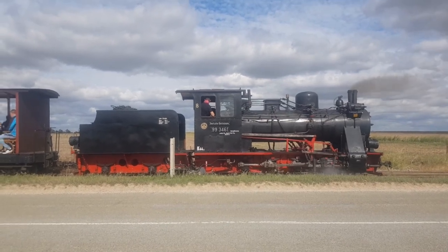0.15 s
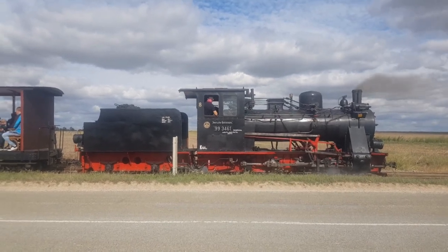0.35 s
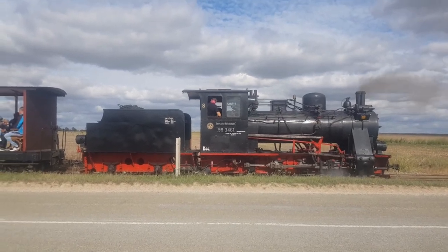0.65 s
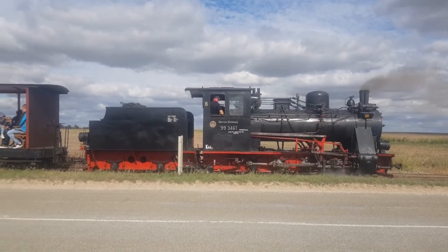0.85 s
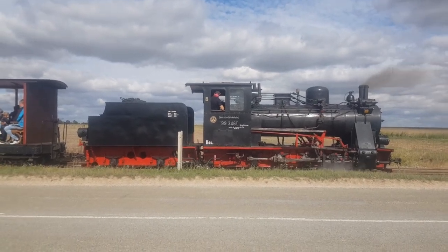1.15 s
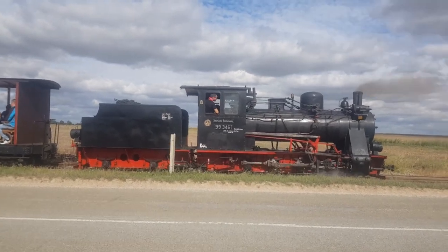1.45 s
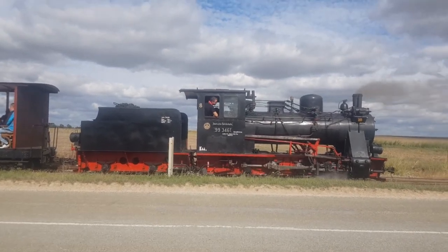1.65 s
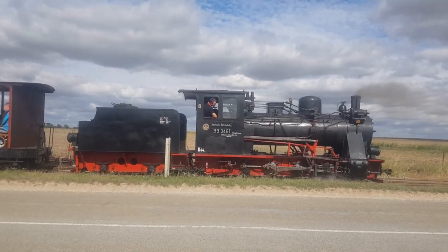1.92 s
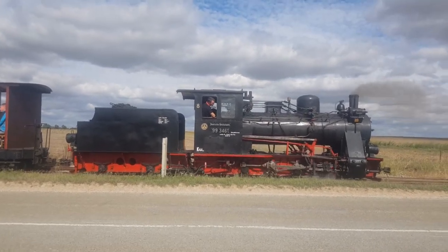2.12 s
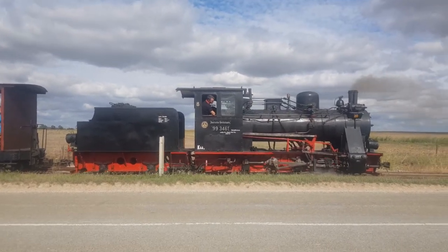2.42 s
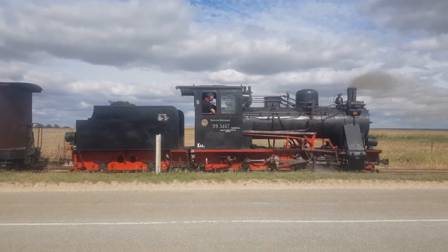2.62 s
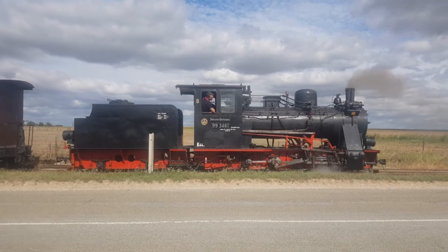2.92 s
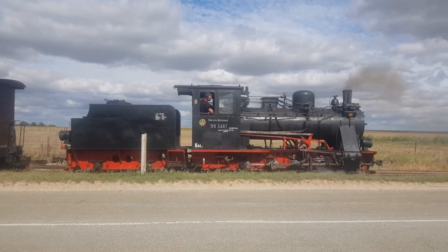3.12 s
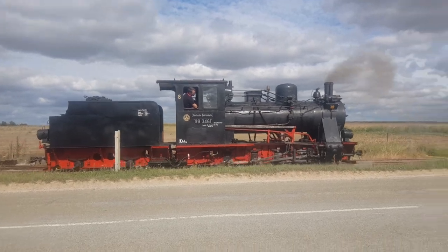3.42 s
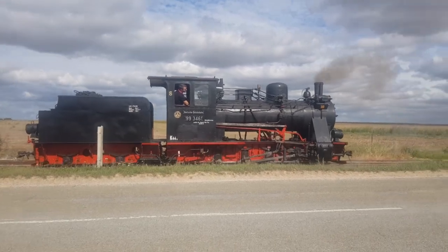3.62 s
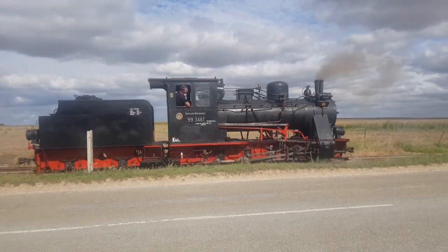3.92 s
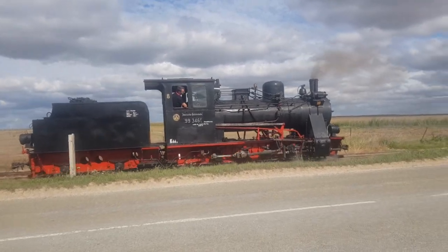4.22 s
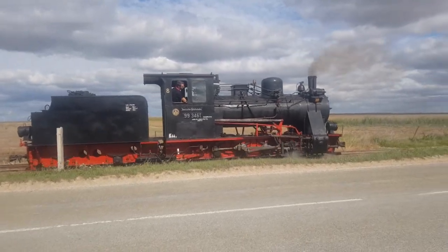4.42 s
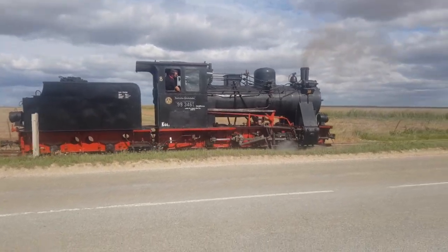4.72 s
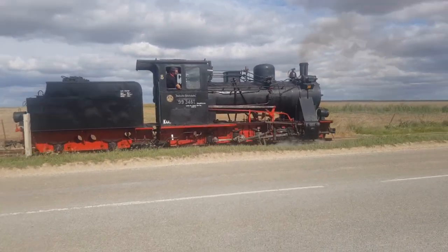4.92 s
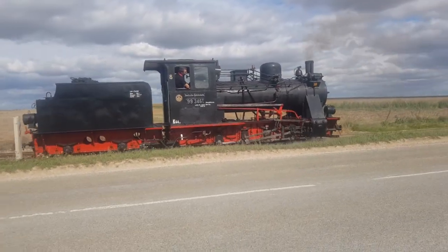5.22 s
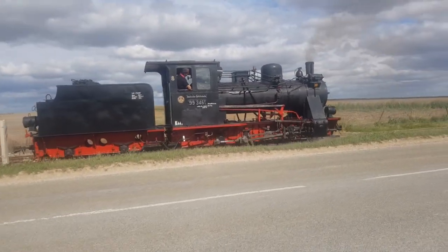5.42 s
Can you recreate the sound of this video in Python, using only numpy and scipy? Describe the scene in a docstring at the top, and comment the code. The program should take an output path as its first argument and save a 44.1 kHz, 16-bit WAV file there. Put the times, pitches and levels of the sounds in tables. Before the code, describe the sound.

A steam jet hisses, surges and fades on the left while low gusts slap a muffled right channel and wind bursts break up the ending.

```python
"""Steam engine passing in the wind

A small steam locomotive rolls slowly past in open, windy country, steam hissing from its cylinder drains.
The jet is shaped noise that surges, dips, briefly whistles and fades as the engine pulls ahead.
It reaches the open left microphone port, where gusts rumble and runs of pressure kicks flutter and splutter.
The right port is muffled: mostly low wind noise and slow slaps on the membrane, with a faint leak of steam.
"""
import sys
import numpy as np
from scipy import signal
from scipy.fft import rfft, irfft, next_fast_len
from scipy.io import wavfile
from scipy.ndimage import uniform_filter1d, map_coordinates

SR = 44100
rng = np.random.default_rng(int(sys.argv[2]) if len(sys.argv) > 2 else 0)


def inscribe(sig):
    """Save sig as 16-bit PCM at rate SR to the path in sys.argv[1].

    A 1-D sig is mono; a 2-D sig holds one channel per row.
    Samples are clipped to [-1, 1] before scaling.
    """
    pcm = np.round(np.clip(np.atleast_2d(sig).T, -1, 1) * 32767)
    wavfile.write(sys.argv[1], SR, pcm.astype(np.int16))


N = 244755


def amp(db):
    """Decibels to gain."""
    return 10 ** (np.asarray(db) / 20)


def unit(x):
    """x scaled to rms 1."""
    return x / np.sqrt(np.mean(x ** 2) + 1e-20)


def curves(rows):
    """One value per sample for each column after the time."""
    s, *columns = np.transpose(rows)
    return [np.interp(np.arange(N) / SR, s, column) for column in columns]


def wobble(rate):
    """A smooth random curve through normal-distributed knots, rate knots a second."""
    knots = rng.standard_normal(int(N * rate / SR) + 4)
    return map_coordinates(knots, [np.arange(N) * rate / SR])


def swells(rows, taper):
    """Each (middle s, length s, dB) event rises, holds and falls; taper is the share spent moving. Sum in dB."""
    t = np.arange(N) / SR
    total_db = np.zeros(N)
    for middle, length, db in rows:
        ramp = np.clip((1 - 2 * abs(t - middle) / length) / taper, 0, 1)
        total_db += db * np.sin(np.pi / 2 * ramp) ** 2
    return total_db


def filtered(x, response):
    """x times a response of frequency."""
    m = next_fast_len(N + 8192)
    spectrum = rfft(x, m) * response(np.fft.rfftfreq(m, 1 / SR))
    return irfft(spectrum, m)[..., :N]


def coloured(x, points):
    """x shaped by (Hz, dB) points on a log axis."""
    f, db = np.transpose(points)
    return filtered(x, lambda hz: amp(np.interp(np.log(hz + 1), np.log(f), db)))


def band(x, lo_hz, hi_hz):
    """The part of x between two soft edges, at rms 1."""
    return unit(filtered(x, lambda hz: ((1 + (lo_hz / (hz + 1)) ** 20) * (1 + (hz / hi_hz) ** 20)) ** -.5))


def turbulence(spectrum, patchy_db):
    """Noise of rms 1 whose colour shifts in random patches."""
    z = signal.stft(rng.standard_normal(N), nperseg=512)[2]
    field = uniform_filter1d(rng.standard_normal(z.shape), size=5, axis=0)  # smooth across frequency
    field = uniform_filter1d(field, size=24, axis=1)  # and across time
    patchy = signal.istft(z * amp(patchy_db * unit(field)), nperseg=512)[1][:N]
    return unit(coloured(patchy, spectrum))


def add(track, s, sound):
    """Mix a short sound into track at s seconds."""
    part = track[max(round(s * SR), 0):][:len(sound)]
    part += sound[:len(part)]


# hiss of the passing jet at the open port, before the common lift in steam(): (time [s], level [dB])
STEAM_LEVEL = [(0, -39), (1.9, -39), (2.88, -40), (2.94, -46), (3.5, -44), (3.75, -42), (4.2, -37.5),
               (4.78, -40), (4.9, -49.5), (5.2, -48), (5.45, -65), (5.55, -59.5)]
# fizz of the spray above the hiss: (time [s], level re hiss [dB])
FIZZ_LEVEL = [(0, 9.5), (3.15, 8.5), (3.3, 2), (3.8, 3), (4.2, 3.5), (4.8, 6), (5.2, -5), (5.55, 13)]
# the jet surges: (middle [s], length [s], rise [dB], extra fizz [dB])
SURGES = [(0.625, 0.16, 1.5, 0), (1.17, 0.13, 0, 2.5), (1.46, 0.19, 3, 1), (1.777, 0.19, 3, 0),
          (2.532, 0.11, 3.5, -1), (2.83, 0.25, 3.5, -1), (3.305, .08, 5.5, -2), (3.432, 0.11, 4.5, -2),
          (3.904, 0.36, 8, -0.5), (4.02, 0.097, -0.5, 7), (4.23, 0.24, 0, 4.5)]
# brief dips of the hiss: the jet chokes, or at 4.9 s the level ducks under a loud gust:
# (middle [s], length [s], change [dB])
DIPS = [(.9, .3, -3), (1.31, 0.11, -2.5), (2.38, 0.11, -1.5), (2.66, 0.18, -1), (3.163, 0.16, -15.5),
        (4.09, 0.14, -3), (4.905, 0.084, -6)]
SURGE_TAPER, DIP_TAPER = 0.9, 0.66  # share of each event spent rising and falling
FULL_FLOW_DB, FULL_RUSH_DB = -39.5, -47  # hiss and rush at full flow, before the common lift
RUSH_FOLLOWS, RUSH_SURGES = 0.56, 0.28  # the rush's share of the slow changes and of the surges


def flow():
    """Levels in dB of hiss, fizz and rush: one flow drives all three, and a dip cuts them alike."""
    middle, length, rise_db, extra_db = np.transpose(SURGES)
    steady_db, = curves(STEAM_LEVEL)
    surge_db = swells(zip(middle, length, rise_db), SURGE_TAPER) + .5 * wobble(11)
    hiss_db = steady_db + surge_db
    extra_fizz_db = swells(zip(middle, length, extra_db), SURGE_TAPER) + 0.65 * wobble(16)
    fizz_db = hiss_db + curves(FIZZ_LEVEL)[0] + extra_fizz_db
    rush_db = FULL_RUSH_DB + RUSH_FOLLOWS * (steady_db - FULL_FLOW_DB) + RUSH_SURGES * surge_db
    return np.array([hiss_db, fizz_db, rush_db]) + swells(DIPS, DIP_TAPER)


# colour of the jet as the engine draws level, stands abeam of the microphone and pulls ahead:
# (frequency [Hz], relative density [dB per Hz])
JET_NEARING = [(1060, -15.5), (1800, -13.5), (2610, -6.5), (3050, -11.5), (3560, -12), (3730, -10),
               (4030, -11.5), (4210, -6), (4620, 0.5), (5120, -7.5), (5650, -2), (6100, -12), (6640, -0.5),
               (7320, -20), (8500, 5), (11000, -35), (18700, -120)]
JET_ABEAM = [(650, -40), (1100, -15), (1520, -16), (1660, -20), (2110, -10), (2400, -8.5), (2630, -9),
             (2890, -12.5), (3210, -8.5), (3400, -16), (3680, -10), (4750, -1), (7100, -5), (7670, -7.5),
             (8500, 4.5), (11000, -30), (18700, -120)]
JET_AHEAD = [(820, -56), (1400, -20), (1570, -10.5), (2060, -8), (2390, -4), (2960, -4), (3540, -6),
             (3940, -7.5), (4280, -18), (4720, -6.5), (5870, 3), (6430, -4), (6830, -5), (7250, -17),
             (8500, -21), (11000, -42), (18700, -120)]
# colour of the finest spray: (frequency [Hz], relative density [dB per Hz])
FIZZ_COLOUR = [(4000, -40), (7000, -6), (7800, -9.5), (9000, -3.5), (10000, -1), (10900, 3), (11900, 0.5),
               (13000, -2), (14400, 1), (15700, -2.5)]
AHEAD_BRIGHT_DB = 7  # lift of the finest spray per step of angle beyond abeam
STEAM_LIFT_DB = 5.5  # common lift of rush, hiss and fizz


def steam():
    """The jet: a hiss that changes colour with the angle, a rush below it and wet fizz above."""
    hiss_db, fizz_db, rush_db = flow()
    # 0 nearing, 1 abeam, 2 ahead; the engine gets about a third of the way from abeam to ahead
    angle, = curves([(.7, 0), (1.1, 1.01), (3.1, 1), (3.8, 1.32)])
    jet = np.zeros(N)
    for k, colour in enumerate([JET_NEARING, JET_ABEAM, JET_AHEAD]):
        share = np.sqrt(np.clip(1 - abs(angle - k), 0, 1))
        jet += share * turbulence(colour, patchy_db=1.94)
    rush = amp(rush_db) * band(jet, 580, 4020)
    hiss = amp(hiss_db) * band(jet, 3940, 6880)
    spray = turbulence(FIZZ_COLOUR, patchy_db=2.0)
    finest = filtered(spray, lambda hz: 1 / (1 + (11000 / (hz + 1)) ** 12))
    # brighter once the engine is ahead
    brightness = amp(AHEAD_BRIGHT_DB * np.maximum(angle - 1, 0))
    spray = spray - finest + finest * brightness
    fizz = amp(fizz_db + 0.84 * wobble(30.06)) * band(spray, 7080, 18200)
    sputter_db = 0.37 * wobble(45) + 0.58 * wobble(250)  # water in the steam makes the flow uneven
    return amp(sputter_db + STEAM_LIFT_DB) * (rush + hiss + fizz)


# the hiss returns from the engine's frame and the ground:
# (first delay [ms], last delay [ms], gain re direct sound [ratio])
ECHOES = [(2.1, 2.4, 0.083), (5.3, 4.9, 0.22), (8.6, 9.1, 0.14)]


def reflected(x):
    """Short echoes drift as the engine moves and comb the hiss."""
    n = np.arange(N)
    total, power = x, 1
    for first_ms, last_ms, gain in ECHOES:
        delay = np.linspace(first_ms, last_ms, N) * SR / 1000  # samples
        total = total + gain * map_coordinates(x, [n - delay], order=3)
        power += gain ** 2
    return total / np.sqrt(power)


# passage through the muffled right port: (frequency [Hz], gain [dB])
LEAK = [(1500, -30), (4000, -43), (5500, -32.5), (8000, -49), (11000, -32.5), (15000, -31)]


def leaked_steam():
    """A separate draw of the jet's noise, dulled by the muffled port, gives a faint diffuse hiss."""
    return coloured(steam(), LEAK)


GUST_TAPER = 0.67  # share of each gust spent rising and falling
BUFFET_RATE, BUFFET_DB = 14, 1.5  # small swings of the wind between the gusts: knots per second, knot spread


def buffeting(level, gusts, spectrum, steady_s, lumpy_db, darkening):
    """Wind on a port: a rolling rumble whose upper part comes in lumps and grows less with a gust."""
    level_db = curves(level)[0] + swells(gusts, GUST_TAPER) + BUFFET_DB * wobble(BUFFET_RATE)
    air = turbulence(spectrum, patchy_db=1.08)
    low = filtered(air, lambda hz: 1 / (1 + (hz / 220) ** 4))
    lumps = unit(amp(lumpy_db * wobble(35)))
    upper_gain = amp(-darkening * (level_db - level_db.mean())) * lumps
    air = low + (air - low) * upper_gain
    # eddies follow each other closely, so the gust alone sets the strength
    window = np.hanning(int(steady_s * SR) + 3)
    power = signal.fftconvolve(air ** 2, window / window.sum(), "same")
    return amp(level_db) * air / np.sqrt(abs(power) + 1e-6)


# wind on the open left port, before its trim in scene(): (time [s], level [dB])
WIND_LEFT = [(0, -36), (1.3, -34.5), (1.8, -48), (2.1, -41), (2.85, -41.5), (3.6, -36), (4.25, -28),
             (4.42, -30), (4.48, -45), (4.75, -29), (5.15, -30), (5.55, -38.5)]
# gusts on the open port: (middle [s], length [s], rise [dB])
GUSTS_LEFT = [(.15, 0.3, 7.5), (0.587, 0.089, 4), (1.339, 0.14, 6), (3.757, 0.21, 4), (4.144, 0.11, 5),
              (4.37, 0.07, 5), (4.621, 0.17, 11), (4.928, 0.31, 13.5), (5.433, .16, 11)]
# wind noise of the open port: (frequency [Hz], relative density [dB per Hz])
OPEN_PORT = [(10, -30), (30, -4.5), (65, -4), (120, -8), (210, -14.5), (340, -7.5), (500, -13.5),
             (800, -21.5), (1400, -34), (3000, -41), (8000, -90)]


def open_wind():
    """Air moving across the bare port keeps more of its upper turbulence."""
    return buffeting(WIND_LEFT, GUSTS_LEFT, OPEN_PORT, steady_s=.08, lumpy_db=4.0, darkening=0.12)


# wind on the muffled right port, before its trim in scene(): (time [s], level [dB])
WIND_RIGHT = [(0, -16), (.5, -17.5), (.8, -12), (1.25, -16.5), (1.38, -20.5), (2.1, -29.5), (2.4, -22.5),
              (3, -26.5), (3.5, -21), (4.05, -17.5), (4.7, -21), (5.55, -26.5)]
# gusts on the muffled port: (middle [s], length [s], rise [dB])
GUSTS_RIGHT = [(.2, 0.056, 2.5), (0.426, 0.12, 5), (0.707, 0.11, 6.5), (1.159, 0.17, 6),
               (1.977, 0.072, 4.5), (3.983, 0.12, 3.5), (4.105, 0.092, 2), (4.56, 0.16, 4),
               (4.821, 0.19, 8.5), (5.057, 0.16, 7), (5.215, 0.097, 9.5), (5.49, 0.18, 8.5)]
# wind noise of the muffled port: (frequency [Hz], relative density [dB per Hz])
MUFFLED_PORT = [(10, -39), (25, -42), (45, -1), (75, 0.5), (130, -6), (250, -15.5), (500, -27), (1000, -43),
                (2000, -57), (3200, -70.5), (8000, -82)]


def dull_wind():
    """Through the muffled port the wind is little but low rumble, darker still in gusts."""
    return buffeting(WIND_RIGHT, GUSTS_RIGHT, MUFFLED_PORT, steady_s=0.094, lumpy_db=3.5, darkening=0.3)


# eddies that break right on the open port, before their trim in scene():
# (time [s], length [s], level [dB], centre [Hz])
FLUTTER = [(0.074, 0.055, -25.5, 420), (3.7, 0.043, -33, 690), (4.128, 0.015, -10, 613),
           (4.338, 0.0087, -21, 1020), (4.373, 0.018, -18.5, 660), (4.775, 0.012, -22, 527),
           (4.812, 0.019, -22, 744), (4.839, 0.0046, -11.5, 633), (4.858, 0.016, -14.5, 650),
           (4.879, 0.043, -13, 545), (4.927, 0.026, -16.5, 434), (4.967, 0.02, -17.5, 460),
           (5.014, 0.042, -20, 550), (5.076, 0.015, -20.5, 440), (5.14, 0.0081, -19, 716),
           (5.161, 0.0064, -20.5, 646), (5.181, 0.036, -20.5, 537), (5.334, 0.021, -22, 397),
           (5.389, 0.012, -28, 417), (5.428, 0.025, -27, 397), (5.462, 0.067, -25.5, 493)]
# the open port rings a little: (frequency [Hz], width [Hz], gain [ratio])
PORT_MODES = [(337, 120, 0.46), (576, 45, 0.33), (1245, 69, 0.71), (2040, 210, 0.6)]
# eddies above this table level fall into step: threshold, its width, greatest regularity
LOCK_DB, LOCK_WIDTH_DB, LOCK_SHARE = -10, 1, 0.71


def flutter(eddy_rate=900, low_hz=250, reach=1.43, edge_s=0.001514):
    """Each burst is a quick run of pressure kicks in the open port; the strongest lock into a short squawk."""
    out = np.zeros(N)
    for s, length, db, hz in FLUTTER:
        n = int(length * SR)
        regular = LOCK_SHARE / (1 + np.exp((LOCK_DB - db) / LOCK_WIDTH_DB))
        count = int(length * eddy_rate) + 2
        places = ((np.arange(count) + rng.random(count)) / count * n).astype(int)
        loose = np.bincount(places, rng.standard_normal(count), n)
        locked = np.diff(np.floor(np.arange(n + 1) * hz / SR + rng.random()))  # one kick a cycle
        kicks = np.sqrt(1 - regular) * unit(loose) + np.sqrt(regular) * unit(locked)
        kicks = np.pad(kicks * signal.windows.tukey(n, .2), (0, SR // 40))  # room to ring out
        # faster eddies are smaller and reach higher
        edge_hz = reach * hz * (1 + 0.48 * regular)
        port = np.vstack([signal.butter(N=2, Wn=low_hz, btype="high", fs=SR, output="sos"),
                          signal.butter(N=1, Wn=edge_hz, fs=SR, output="sos"),
                          signal.butter(N=2, Wn=edge_hz, fs=SR, output="sos"),
                          signal.butter(N=2, Wn=2400, fs=SR, output="sos")])
        burst = signal.sosfilt(port, kicks)
        ringing = sum(gain * signal.lfilter(*signal.iirpeak(f, f / width, SR), burst)
                      for f, width, gain in PORT_MODES)
        burst = burst + ringing
        add(out, s - edge_s, amp(db) * burst / np.sqrt(np.sum(burst ** 2) / n))
    return out


# heavy slaps of wind on the muffled port, before their trim in scene():
# (middle [s], length [s], pitch midway [Hz], peak level [dB])
THUMPS = [(0.1, 0.024, 81.4, -2.5), (0.331, 0.031, 76.4, -2), (0.692, 0.029, 75, -11),
          (1.21, 0.032, 71, -5), (4.116, 0.042, 68.6, -7.5), (4.435, 0.045, 78.5, -4),
          (4.816, 0.0326, 84, -0.5), (5.22, 0.04, 61, 1.5), (5.491, 0.041, 65.6, -1.5)]


def thumps():
    """A large eddy shoves the membrane to and fro for a few slowing swings."""
    out = np.zeros(N)
    for s, length, hz, db in THUMPS:
        t = np.arange(int(length * SR)) / SR
        swings = hz * t * (1.2 - 0.19 * t / length)  # the swings slow as the eddy passes
        shove = np.sin(2 * np.pi * (swings + rng.random()))
        add(out, s - length / 2, amp(db) * signal.windows.tukey(len(t), .8) * shove)
    return out


# the jet briefly whistles: (middle [s], length [s], pitch [Hz], level of the tone [dB])
WHISTLES = [(1.616, 0.097, 3650, -33.5), (3.065, 0.063, 2970, -40), (3.228, 0.024, 2920, -44)]
# rough air around a whistle: level re the tone, band edges as shares of its pitch
HALO_DB, HALO_LOW, HALO_HIGH = -5.5, .75, 1.16


def whistles(width_hz=40):
    """For moments the jet locks onto an edge and gives a breathy tone."""
    out, t = np.zeros(N), np.arange(N) / SR
    waver = unit(filtered(rng.standard_normal(N), lambda hz: 1 / (1 + (hz / width_hz) ** 2)))
    for s, length, hz, db in WHISTLES:
        swell = np.cos(np.pi * np.clip((t - s) / length, -.5, .5))
        tone = unit(waver * np.sin(2 * np.pi * hz * t))
        halo = amp(HALO_DB) * band(rng.standard_normal(N), HALO_LOW * hz, HALO_HIGH * hz)
        out += amp(db) * swell * (tone + halo)
    return out


def scene():
    """Steam and spluttering wind on the left, dull wind rumble and a faint diffuse hiss on the right."""
    engine = reflected(steam()) + whistles()
    left = engine + amp(1.0) * open_wind() + amp(0.54) * flutter()
    right = leaked_steam() + amp(0.1) * dull_wind() + amp(-1.5) * thumps()
    return np.array([left, right])


TOP_HZ = 15760  # band limit


def record(dry):
    """The microphone's recorder rounds off the largest peaks and keeps nothing above its band limit."""
    rounded = dry / (1 + abs(dry) ** 8) ** (1 / 8)
    return filtered(rounded, lambda hz: hz < TOP_HZ)


dry = scene()
out = record(dry)
inscribe(out)
```